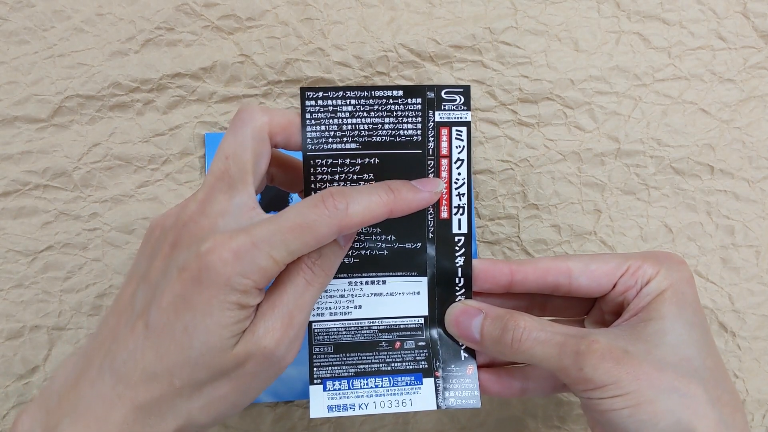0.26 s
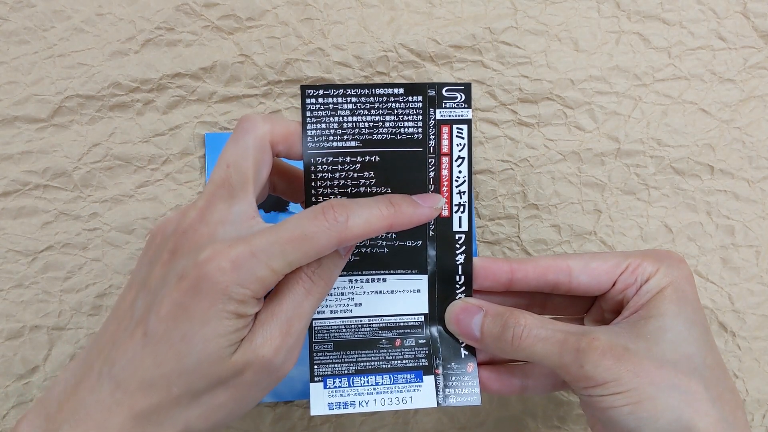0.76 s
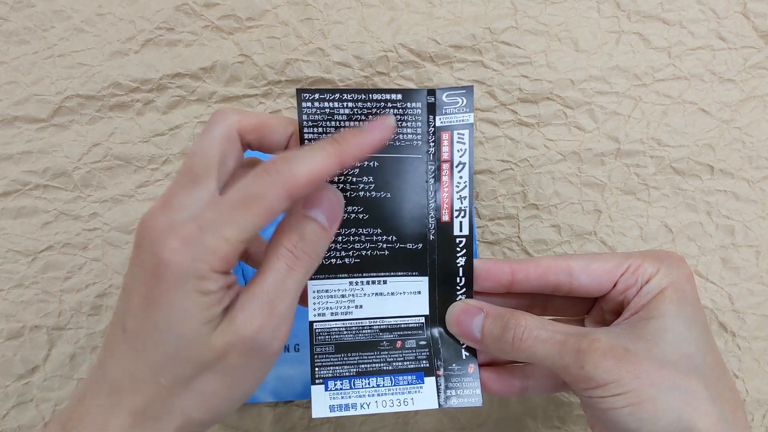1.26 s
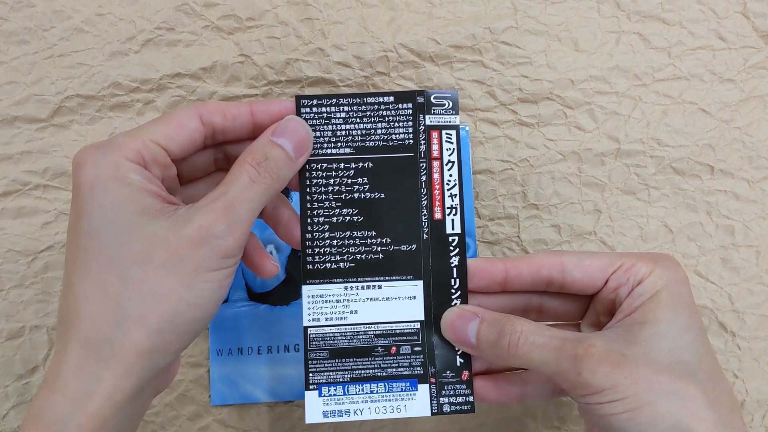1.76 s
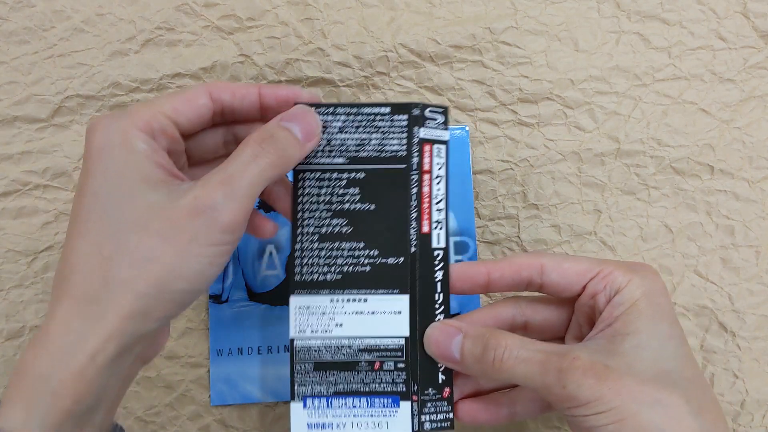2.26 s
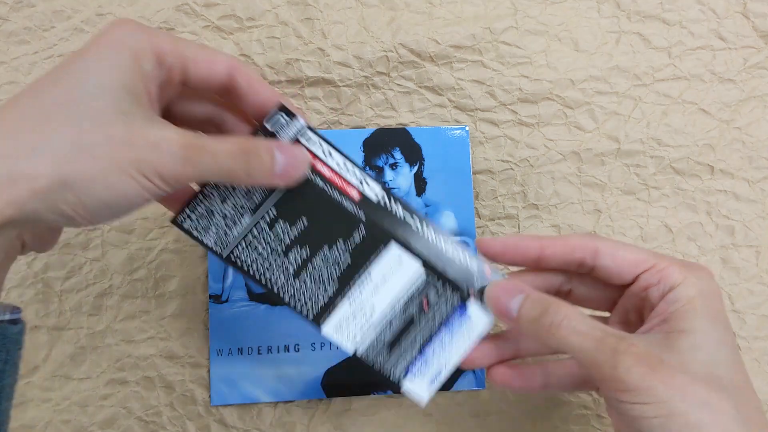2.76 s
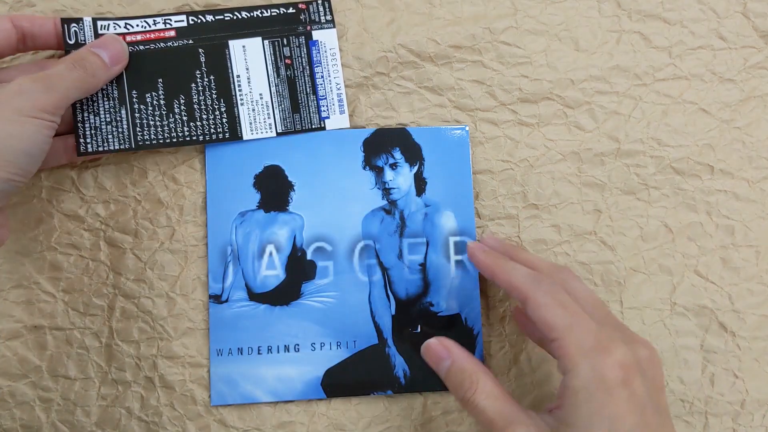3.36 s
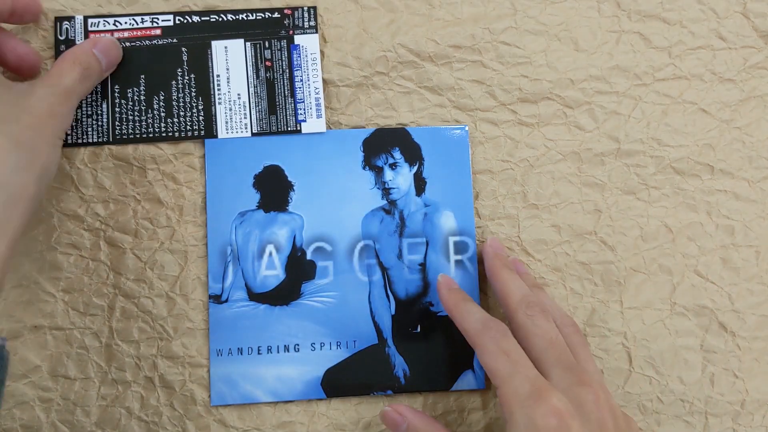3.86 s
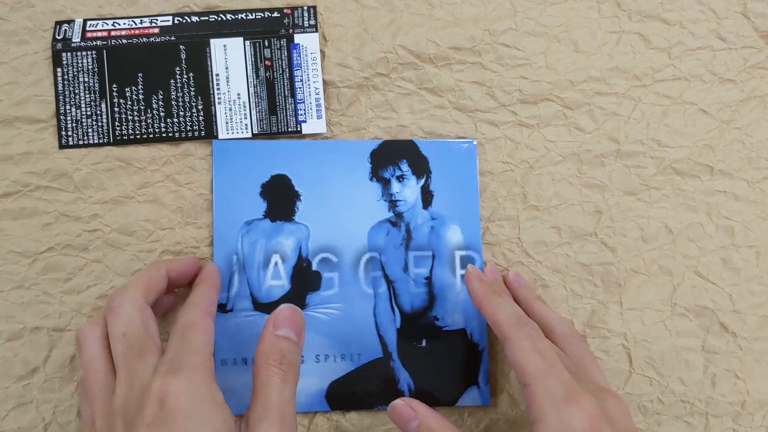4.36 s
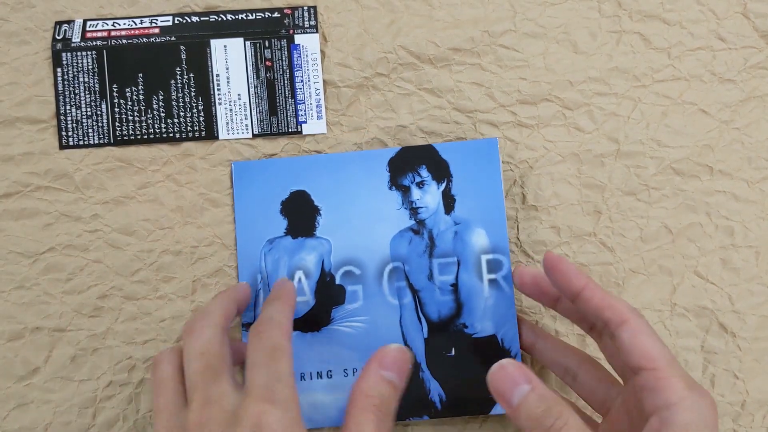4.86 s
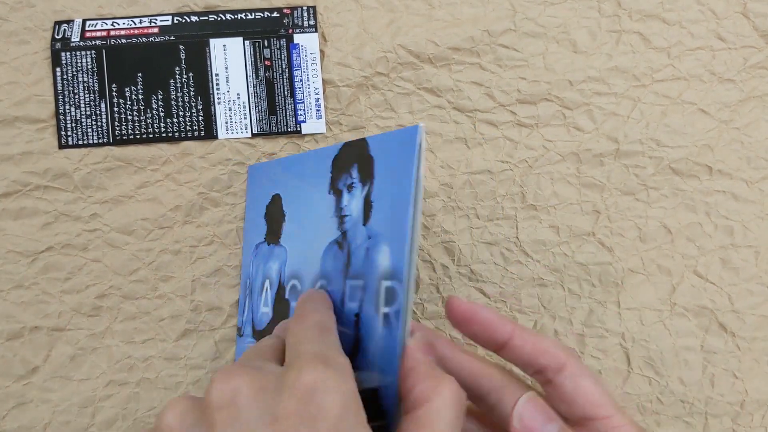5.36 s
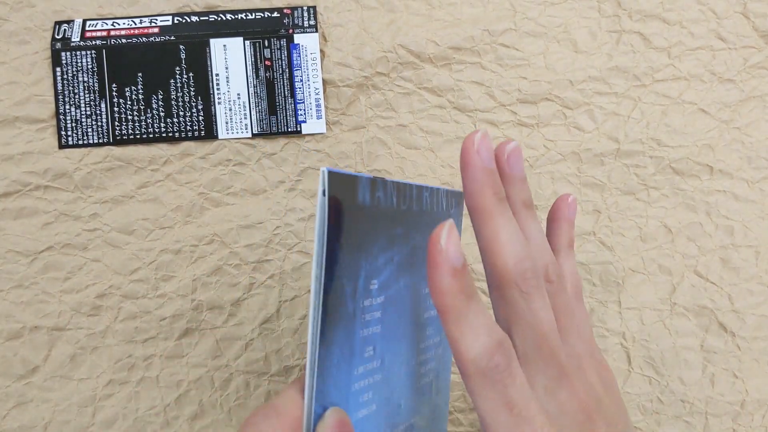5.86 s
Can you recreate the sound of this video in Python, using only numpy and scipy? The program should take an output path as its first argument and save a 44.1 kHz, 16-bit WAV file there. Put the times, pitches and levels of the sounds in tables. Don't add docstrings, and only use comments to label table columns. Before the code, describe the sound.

In a quiet room, hands handle a stiff paper strip close to a small microphone. After near silence and a faint rub, the strip buckles with a loud pop and snaps back more softly. Rustles and low card knocks follow, then sliding, a quick rising pull ending in a flick, and dull scrapes of a cardboard sleeve. Low hum and soft hiss continue underneath.

```python
import sys
import numpy as np
from scipy import signal
from scipy.io import wavfile
from scipy.ndimage import uniform_filter1d

SR = 44100
rng = np.random.default_rng(int(sys.argv[2]) if len(sys.argv) > 2 else 0)


def rack_gain(trim_db):
    fader = np.asarray(trim_db, float)
    return 10 ** (fader / 20)


def transcribe(signal):
    frames = np.atleast_2d(signal).T
    limited = np.clip(frames, -1, 1)
    pcm = np.round(limited * 32767).astype(np.int16)
    wavfile.write(sys.argv[1], SR, pcm)


N = 270333
LONGEST = 24000

# (frequency [Hz], density [dB per Hz])
AIR_SPECTRUM = [(12, -37.5), (20, -3.5), (48, -3.5), (72, -0.5), (107, -9.5), (156, -11), (366, -22.5),
                (881, -24.5), (1080, -25.5), (1490, -26.5), (3160, -27.5), (5220, -30), (7420, -36),
                (8000, -36), (10400, -78.5), (17600, -120)]
# (frequency [Hz], width [Hz], level [dB])
HUM_LINES = [(55.2, 5.2, -66.5), (142.2, 9.9, -63), (197, 15, -65.5)]
# (time [s], frequency [Hz], level [dB])
DUCT_THROB = [(0.0, 54.2, -53.5), (0.6, 60.5, -43), (1.01, 56.8, -54), (1.19, 61.7, -55),
              (1.96, 60.96, -51), (2.8, 57.64, -49.5), (3.33, 57.23, -52), (3.55, 61.64, -48),
              (3.86, 56.5, -64), (4.05, 60.6, -56), (4.299, 62.7, -61), (4.46, 56.9, -52.5),
              (5.04, 58.86, -52), (5.09, 61.96, -51), (5.62, 60.5, -43), (5.74, 63.96, -54.5),
              (5.84, 59.8, -49), (6.13, 59.8, -47.5)]
# (frequency [Hz], t60 [s])
ROOM_T60 = [(250, 0.34), (1000, 0.37), (3000, 0.14), (8000, 0.13)]
# (frequency [Hz], level [dB])
WALL_COLOUR = [(250, -1), (1100, -3), (2200, -3.5), (4000, 1.5), (8000, -0.5)]

# (frequency [Hz], width [Hz], level [dB])
STRIP_MODES = [(3740, 1000, -1.5), (5800, 940, 0.5), (7600, 1400, -5), (5200, 1800, -13)]
TAUT_MODES = [(3300, 1070, 6), (4280, 460, -10), (5200, 600, 0), (6400, 490, 1.5), (7600, 540, -7)]
CARD_MODES = [(1133, 160, 2), (1520, 420, -1.5), (1920, 130, -5.5), (872, 360, -0.5)]
FACE_MODES = [(979, 440, -17), (1300, 303, 3.5), (1560, 350, -3), (1900, 420, -2)]
SLEEVE_MODES = [(338, 360, -8.5), (480, 147, 2), (810, 400, -4), (243, 61, -2)]
# (frequency [Hz], level [dB], t60 [s])
KNOCK_RING = [(477, -5.5, 0.017), (755, -4.5, 0.022), (1150, 12, 0.02), (1463, 1.5, 0.023),
              (2100, 3.5, 0.014)]
POP_RING = [(376.6, -24, 0.038), (600, -20, 0.016), (772, -14.5, 0.018), (1150, -1, 0.01), (1310, -9, 0.01),
            (1832, -2.5, 0.0076), (2280, -8.5, 0.0092), (2877, -13, 0.0084), (3270, -13, 0.016),
            (4160, -22.5, 0.012), (5000, -37.5, .008), (5960, -31, .007)]
POP_BACK_RING = [(440, -8, 0.026), (834, -7, 0.027), (1032, 0, 0.023), (1353, 0, 0.02), (1940, -10, 0.017),
                 (2750, -10.5, 0.014), (3630, -3, 0.013), (4580, -13, 0.0088), (5140, -6, 0.0075),
                 (6000, -10.5, 0.011), (6400, -19, 0.0094), (7740, -15, .007)]
FLICK_RING = [(1050, -8.5, 0.019), (1570, -6.5, 0.019), (2100, -7, 0.0084), (2365, -2.5, 0.0099),
              (2625, 4.5, 0.011), (3210, 7, 0.0075), (3620, -1, 0.0096), (4070, -1, 0.013),
              (4720, -1, 0.0083), (6270, -11, 0.01), (7490, -16, 0.0095)]

# (start [s], hardest [s], end [s], level [dB], easing at both ends [dB])
SLEEVE_MOANS = [
    (3.89, 3.897, 3.908, -39, 10),
    (3.902, 3.916, 4.08, -55.5, 16),
    (4.185, 4.306, 4.43, -51, 8.2),
    (4.481, 4.516, 4.6, -47, 11),
]
TABLE_TOP_MOANS = [
    (5.0, 5.039, 5.35, -56.5, 7),
    (5.39, 5.508, 5.59, -56.5, 12),
]
STRIP_STROKES = [(2.2, 2.32, 2.5, -57.5, 15), (2.341, 2.345, 2.44, -53, 15), (2.35, 2.42, 2.54, -58, 7),
                 (2.1, 2.13, 2.5, -65.5, 5), (2.5, 2.544, 2.598, -57.5, 2), (2.598, 2.612, 2.596, -41, 2)]
TAUT_STROKES = [(1.213, 1.24, 1.28, -49, 3), (1.282, 1.288, 1.27, -51, 3), (2.05, 2.06, 2.08, -56.5, 3.8),
                (2.086, 2.092, 2.09, -50, 5)]
CARD_STROKES = [(.95, .97, 1.02, -62, 5.4), (1.213, 1.25, 1.28, -49.5, 3), (1.282, 1.288, 1.31, -58, 3.5),
                (1.97, 2.0, 2.06, -60, 11), (2.05, 2.06, 2.16, -58, 4.96), (2.078, 2.094, 2.108, -46.5, 9),
                (2.24, 2.29, 2.32, -55.5, 2.85), (2.32, 2.336, 2.36, -50, 4.2),
                (2.37, 2.42, 2.46, -54.5, 4), (2.5, 2.508, 2.525, -58, 6),
                (2.584, 2.603, 2.629, -52.5, 5.8), (3.887, 3.894, 3.97, -50.5, 20),
                (4.02, 4.036, 4.07, -64, 9.4), (4.25, 4.31, 4.4, -63, 4.7), (4.476, 4.51, 4.545, -51, 9.3),
                (4.8, 4.88, 4.94, -64, 6.2), (5.1, 5.11, 5.2, -64, 2.97), (5.22, 5.28, 5.3, -59.5, 11)]
FACE_STROKES = [(4.488, 4.512, 4.53, -46.5, 5.9), (4.545, 4.57, 4.595, -51.5, 3.7),
                (4.592, 4.605, 4.622, -48.5, 5.4)]
SLEEVE_STROKES = [(.95, .99, 1.02, -60, 6), (1.032, 1.042, 1.05, -49, 6), (1.214, 1.27, 1.293, -53, 3.8),
                  (2.2, 2.21, 2.26, -65, 8.7), (2.338, 2.344, 2.352, -50.5, 8.6),
                  (2.44, 2.46, 2.6, -58.5, 7.6), (3.886, 3.894, 3.96, -43, 25), (4.02, 4.036, 4.06, -57, 8),
                  (4.16, 4.3, 4.49, -59.5, 4.43), (4.482, 4.528, 4.55, -43.5, 6.5),
                  (4.54, 4.56, 4.62, -59, 7.9)]
# (start [s], hardest [s], end [s], level [dB], centre [Hz])
FINGER_SLIDES = [(0.293, 0.353, .362, -60, 4280), (0.945, 1.026, 1.028, -45.5, 4070),
                 (1.027, 1.039, 1.048, -44.5, 4300), (3.033, 3.09, 3.16, -49.5, 3600),
                 (3.13, 3.317, 3.47, -50, 3300), (3.883, 3.889, 3.93, -48, 5000),
                 (3.885, 3.932, 4.0, -52, 5200), (4.005, 4.144, 4.2, -54.5, 5800),
                 (4.139, 4.215, 4.31, -52, 5400), (4.238, 4.314, 4.41, -51.5, 5610),
                 (4.801, 4.849, 4.96, -57.5, 3720), (5.096, 5.116, 5.2, -56.5, 3686),
                 (5.224, 5.287, 5.3, -48, 3930), (4.417, 4.506, 4.56, -54, 3600),
                 (4.542, 4.578, 4.6, -56, 4000), (4.593, 4.61, 4.625, -52, 4800),
                 (4.648, 4.67, 4.69, -54, 4600)]
EDGE_DRAGS = [
    (3.057, 3.094, 3.125, -48, 2220),
    (3.952, 4.008, 4.08, -48, 6140),
]
# (time [s], level [dB], centre [Hz])
STRIP_PULL = [(3.43, -51, 4000), (3.47, -57.5, 3600), (3.552, -50.5, 3780), (3.6, -51, 4600),
              (3.638, -49, 5360), (3.649, -39.5, 5200), (3.657, -34.5, 4600), (3.66, -45, 4000)]
# (time [s], level [dB], frequency [Hz], upper re lower [dB])
PULL_RIDGES = [(3.43, -56, 2700, -4), (3.47, -58.5, 2900, -9), (3.53, -51, 2900, -9),
               (3.575, -53.5, 3050, -3), (3.605, -48.5, 3420, -3), (3.63, -44.5, 3220, -3),
               (3.648, -58, 3380, 0)]
# (start [s], hardest [s], end [s], level [dB], frequency [Hz])
SHEET_SQUEAKS = [(1.607, 1.616, 1.63, -41.5, 1350), (1.623, 1.63, 1.67, -56, 1200),
                 (1.621, 1.631, 1.644, -44.5, 2100), (2.076, 2.088, 2.098, -44, 3500),
                 (2.088, 2.09, 2.098, -48, 6300), (2.056, 2.059, 2.064, -62, 3400),
                 (2.343, 2.35, 2.5, -62, 3800), (2.41, 2.428, 2.45, -51.5, 3690),
                 (2.515, 2.54, 2.595, -59, 5770), (3.775, 3.779, 3.783, -55, 7400),
                 (3.782, 3.794, 3.806, -57, 3270), (4.484, 4.51, 4.525, -51, 1200),
                 (4.554, 4.575, 4.592, -50, 1400), (4.662, 4.668, 4.686, -52, 2680),
                 (4.655, 4.676, 4.687, -50, 1460)]
FACE_SCRAPES = [(2.165, 2.33, 2.47, -60, 2270), (2.491, 2.56, 2.6, -65, 2610),
                (4.504, 4.54, 4.555, -48.5, 2700), (4.545, 4.575, 4.597, -49, 2400),
                (4.591, 4.605, 4.62, -47, 2190), (4.614, 4.63, 4.66, -56.5, 2390),
                (4.648, 4.672, 4.688, -51.5, 2380)]
CREASE_RUBS = [(.953, .985, 1.0, -53, 4200), (.985, 1.008, 1.027, -50, 4900),
               (.99, 1.012, 1.027, -52, 2600), (1.0, 1.024, 1.027, -52, 6200),
               (1.03, 1.04, 1.047, -52, 4300), (1.856, 1.86, 1.866, -53, 3050),
               (2.062, 2.07, 2.08, -54, 4000), (3.03, 3.04, 3.06, -56, 4400),
               (3.08, 3.086, 3.095, -51, 4200), (3.879, 3.884, 3.893, -52, 7000),
               (3.918, 3.927, 3.94, -52, 6100), (3.92, 3.93, 3.935, -54, 7300),
               (3.93, 3.94, 3.95, -54, 3600), (4.526, 4.533, 4.546, -52, 4400),
               (4.598, 4.603, 4.612, -52, 5100), (2.6, 2.605, 2.625, -52, 1100)]

# (time [s], peak [dB], frequency [Hz], width [octaves])
FIBRE_BLIPS = [(1.214, -34, 3500, 2.5), (2.057, -48, 5800, .12), (2.0575, -44, 7600, .12),
               (2.064, -44, 7600, .12), (2.0946, -40.5, 1190, 0.46), (2.3425, -39.5, 3700, 0.14),
               (2.343, -40, 5630, .15), (2.5855, -42, 2980, 2.5), (2.9478, -39, 3000, 2.18),
               (2.9495, -40, 2007, .5), (3.091, -33, 2100, 0.3), (3.1, -26.5, 1980, 1.9),
               (3.105, -38, 2710, .6), (3.163, -37, 3000, 1.2), (3.062, -41, 5200, .2),
               (3.6225, -40, 3500, .6), (3.647, -36, 4500, 1.), (3.7583, -36, 1580, .4),
               (3.7594, -32.5, 2600, 0.26), (4.2987, -32, 3000, 1.9), (4.305, -39, 3500, 2.),
               (4.206, -43, 5900, .2), (4.225, -45, 4200, .15), (2.6, -36, 5940, 0.25),
               (2.4685, -33, 600, 0.9), (3.891, -39.5, 3125, .15), (3.886, -36, 5200, 0.16),
               (3.904, -43, 350, 0.94), (1.0364, -40, 706, 1.7), (1.0405, -45, 496, 0.9),
               (4.493, -35, 900, 1.2), (4.5135, -36, 1200, .8)]
CREASE_BLIPS = [(1.6042, -11.5, 1780, 0.99), (1.606, -23, 2600, 1.2), (1.8366, -22, 1090, 1.7),
                (1.8418, -25, 1190, 0.31), (1.847, -29.5, 1200, 0.48), (1.85, -37, 1195, .33)]
# (time [s], peak [dB], centre [Hz], card ring re crack [dB], width [octaves])
EDGE_TICKS = [(1.285, -39, 3170, -24, 0.52), (2.055, -45, 5640, 3, 2.2), (3.112, -47, 2300, -21, 0.58),
              (3.435, -48, 2730, -19, .44), (3.513, -37.5, 3530, -25, 1.1), (3.764, -39.5, 2555, -6, 0.79),
              (3.774, -40.5, 3500, -11.5, 2.3), (3.884, -38, 5300, -17.5, 0.39),
              (4.301, -40, 4280, -5, 2.1), (4.321, -40.5, 4000, -1, 2.1), (5.034, -38.5, 3440, -5.5, 1.7),
              (4.594, -43, 2600, -10, 1.5)]
FIBRE_SNICKS = [(2.599, -30, 4500, -9, 1.8), (2.948, -41, 3500, -17, 1.4), (1.214, -40, 3420, -6.5, 1.2),
                (3.1, -44, 2460, -10, 1), (3.163, -42, 2800, -17, 0.83), (3.655, -24, 4140, -25, 1.3),
                (4.204, -41, 5777, -20, .6), (4.2981, -33.5, 3190, -3, 1.8),
                (5.048, -36.5, 5870, -21, 0.55), (5.295, -36, 5000, -17, 2.6),
                (0.317, -45.5, 4600, -17, .6), (.349, -46, 4800, -22, 1), (2.258, -45, 4500, -7, 2.1),
                (2.331, -37.5, 3800, -7, 1), (2.585, -37, 3800, -11, 2.9), (3.567, -45, 3350, -20, 1.1),
                (3.601, -46, 3550, -23, 0.91)]
# (time [s], peak [dB], main ring [Hz], crack re ring [dB])
CARD_KNOCKS = [(1.033, -41.5, 850, -21), (2.094, -36.5, 1150, -19), (2.296, -41, 1300, -20),
               (2.341, -30, 1290, -10), (2.4671, -29, 983, -11), (2.471, -24.5, 865, -19),
               (2.476, -30.5, 1236, -19), (2.482, -34.5, 1210, -23), (2.503, -41.5, 401, -22),
               (3.016, -36, 296, -13), (3.8906, -25.5, 350, -21), (4.039, -45, 576, -18),
               (2.342, -34, 500, -16), (4.4972, -35, 480, -19), (4.5035, -32, 454, -14),
               (4.521, -31, 437, -17), (4.529, -34, 399, -14), (4.5326, -33, 410, -11)]
# (time [s], peak [dB], rise [s], crack re ring [dB])
FLICK_RELEASES = [
    (3.7535, -25, 0.0007, -25),
    (3.7549, -28, 0.00024, -18),
    (3.7563, -18.5, 0.00079, -19),
    (3.7588, -27.5, 0.00038, -21),
]
POP_RELEASES = [
    (1.6043, -13, .001, -40),
    (1.60605, -14, .0006, -30),
]
POP_BACK_RELEASES = [
    (1.8368, -18, 0.00058, -10),
    (1.8392, -27, 0.00022, -4),
    (1.845, -40, 0.001, -17),
    (1.8555, -38, 0.001, -25),
]
# (time [s], level [dB], centre [Hz], width [octaves], t60 [s])
STRIP_SHIVERS = [
    (1.61, -39, 1770, 1.4, 0.24),
    (1.844, -41.5, 1300, 1.6, 0.14),
]


def evened(x):
    return x / np.sqrt(np.mean(x ** 2) + 1e-20)


def read(points, hz):
    f, value = np.transpose(points)
    return np.interp(np.log(hz + 1), np.log(f + 1), value)


def add(mix, s, sound):
    part = mix[round(s * SR):][:len(sound)]
    part += sound[:len(part)]


def mixed(sounds):
    out = np.zeros(N)
    for s, sound in sounds:
        add(out, s, sound)
    return out


def wander(size, span):
    noise = rng.standard_normal(max(size, LONGEST))
    return evened(uniform_filter1d(uniform_filter1d(noise, span), span))[:size]


def resonate(x, hz, width, order=2):
    turn = np.exp(2j * np.pi * np.cumsum(hz * np.ones(len(x))) / SR)
    r = np.exp(-np.pi * width / SR)
    low = x / turn
    for _ in range(order):
        low = signal.lfilter([1 - r], [1, -r], low)
    return 2 * (turn * low).real


def band(x, hz, octaves):
    return evened(resonate(x, hz, np.mean(hz) * np.clip(octaves, .1, 3), order=3))


def air():
    frames, hz = N // 1024 + 5, np.fft.rfftfreq(4096, 1 / SR)
    a, b, patches = rng.standard_normal((frames, 2049, 3)).T
    patches = evened(uniform_filter1d(uniform_filter1d(patches, 40, 0), 5, 1))
    z = (a + 1j * b) * rack_gain(read(AIR_SPECTRUM, hz)[:, None] + .7 * patches)
    out = rack_gain(-48.5) * evened(signal.istft(z, nperseg=4096, noverlap=3072)[1][:N])
    for hz, width, db in HUM_LINES:
        out += rack_gain(db) * evened(resonate(rng.standard_normal(N), hz, width))
    return out


def throb():
    s, hz, db = np.transpose(DUCT_THROB)
    t = np.arange(N) / SR
    turns = np.cumsum(np.interp(t, s, hz) + 1.42 * wander(N, 3000)) / SR
    level_db = np.interp(t, s, db) - 1.5 + 2.5 * wander(N, 2500)
    return np.sqrt(2) * rack_gain(level_db) * np.sin(2 * np.pi * turns)


def room(x):
    taps = np.zeros(SR // 2)
    at = np.arange(200, SR // 2 - 20, 20)
    taps[at + rng.integers(0, 20, len(at))] = rng.choice([-1., 1.], len(at))
    hz, t, z = signal.stft(taps, SR, nperseg=256)
    decay_db = read(WALL_COLOUR, hz)[:, None] - 60 * t / read(ROOM_T60, hz)[:, None]
    tail = signal.istft(z * rack_gain(decay_db), SR, nperseg=256)[1]
    return signal.fftconvolve(x, tail / np.linalg.norm(tail))[:N]


def press(start, hardest, end, db, ease_db):
    t = np.arange(start, end, 1 / SR)
    away = np.interp(t, [start, hardest, end], [1, 0, 1])
    contact = np.clip(np.minimum(t - start, end - t) / 0.0016, 0, 1)
    return rack_gain(db - ease_db * away ** 1.54) * contact


def moan(row, hz):
    gain = press(*row)
    return row[0], gain * evened(resonate(rng.standard_normal(LONGEST)[:len(gain)], hz, 59))


def friction(size, grain_db=2.5, slips_per_s=12000, clump_db=0.8):
    pick, sign, heft = rng.random(LONGEST), rng.standard_normal(LONGEST), rng.exponential(1, LONGEST)
    clicks = sign * (pick < slips_per_s / SR) * rack_gain(grain_db * np.minimum(heft, 4))
    return clicks[:size] * rack_gain(clump_db * wander(size, 250))


def body(x, modes, flutter_db=1.5):
    out = np.zeros(len(x))
    for k, (hz, width, db) in enumerate(modes):
        gain = rack_gain(db + flutter_db * wander(len(x), 300))
        out += (-1) ** k * gain * resonate(x, hz, width)
    return evened(out)


def rub(row, modes):
    gain = press(*row)
    return row[0], gain * body(friction(len(gain)), modes)


def hiss(size, hz, octaves):
    share = np.clip((octaves - .3) / 1.28, 0, 1)
    narrow = band(friction(size), hz, np.mean(octaves))
    wide = band(friction(size), 4300, 2.04)
    return np.sqrt(1 - share) * narrow + np.sqrt(share) * wide


def slide(start, hardest, end, db, hz, octaves, ease_db):
    gain = press(start, hardest, end, db, ease_db)
    below_peak_db = 20 * np.log10(gain + 1e-9) - db
    return start, gain * hiss(len(gain), hz, octaves + 0.05 * below_peak_db)


def pull():
    s, db, hz = np.transpose(STRIP_PULL)
    t = np.arange(s[0], s[-1], 1 / SR)
    sound = hiss(len(t), np.interp(t, s, hz), 0.78)
    return s[0], rack_gain(np.interp(t, s, db)) * sound * signal.windows.tukey(len(t), .03)


def squeak(start, hardest, end, db, hz, octaves, ease_db):
    gain = press(start, hardest, end, db, ease_db)
    return start, gain * band(friction(len(gain), clump_db=2.5), hz, octaves)


def ridges():
    s, db, hz, upper_db = np.transpose(PULL_RIDGES)
    t = np.arange(s[0], s[-1], 1 / SR)
    hz = np.interp(t, s, hz)
    grit = friction(len(t), grain_db=0.5, slips_per_s=4600, clump_db=1.5)
    lower = band(grit, hz, 0.3)
    upper = rack_gain(np.interp(t, s, upper_db)) * band(grit, 1.27 * hz, 0.3)
    return s[0], rack_gain(np.interp(t, s, db)) * (lower + upper) * signal.windows.tukey(len(t), .05)


def blip(s, db, hz, octaves):
    out = band(-signal.unit_impulse(1500), hz, octaves)
    return s, rack_gain(db) * out / abs(out).max()


def crackle(hz, octaves, length_s, tail_s=0.0025):
    t = np.arange(1500) / SR
    shape = np.clip(t / 0.00024, 0, 1) * np.exp(-np.maximum(t - length_s, 0) / tail_s)
    out = band(rng.standard_normal(len(t)) * shape, hz, octaves)
    return out / abs(out).max()


def tick(s, db, hz, ring_db, octaves, length_s):
    bright = crackle(hz, octaves, length_s)
    return s, rack_gain(db) * (bright + rack_gain(ring_db) * crackle(1210, 0.89, length_s))


def shiver(s, db, hz, octaves, t60):
    t = np.arange(SR // 4) / SR
    gain = rack_gain(db - 60 * t / t60) * np.clip(t / 0.0027, 0, 1)
    return s, gain * band(friction(len(t), clump_db=1.5), hz, octaves)


def ring(modes, stretch, rise_s):
    t = np.arange(3000) / SR
    out = sum(rack_gain(db - 60 * t / t60) * np.sin(2 * np.pi * hz * stretch * t) for hz, db, t60 in modes)
    out = -out * np.clip(t / max(rise_s, 1 / SR), 0, 1)
    return out / abs(out).max()


def pop(modes, stretch, s, db, rise_s, crack_db):
    sound = ring(modes, stretch, rise_s)
    add(sound, 0, rack_gain(crack_db) * crackle(3000, 3.6, 0.0025))
    return s, rack_gain(db) * sound


def scene():
    background = air() + throb()
    sounds = [moan(row, 336) for row in SLEEVE_MOANS] + [moan(row, 200) for row in TABLE_TOP_MOANS]
    for rows, modes in [(STRIP_STROKES, STRIP_MODES), (TAUT_STROKES, TAUT_MODES), (CARD_STROKES, CARD_MODES),
                        (FACE_STROKES, FACE_MODES), (SLEEVE_STROKES, SLEEVE_MODES)]:
        sounds += [rub(row, modes) for row in rows]
    sounds += [slide(*row, octaves=1.35, ease_db=11.5) for row in FINGER_SLIDES]
    sounds += [slide(*row, octaves=0.87, ease_db=11.5) for row in EDGE_DRAGS]
    sounds += [pull(), ridges()]
    sounds += [squeak(*row, octaves=0.19, ease_db=4) for row in SHEET_SQUEAKS]
    sounds += [squeak(*row, octaves=1.47, ease_db=5.5) for row in FACE_SCRAPES]
    sounds += [squeak(*row, octaves=.25, ease_db=10) for row in CREASE_RUBS]
    sounds += [blip(*row) for row in FIBRE_BLIPS]
    sounds += [tick(*row, length_s=0.0057) for row in EDGE_TICKS]
    sounds += [tick(*row, length_s=0.00086) for row in FIBRE_SNICKS]
    for s, db, hz, crack_db in CARD_KNOCKS:
        sounds.append(pop(KNOCK_RING, hz / 1150, s, db, 0.00083, crack_db))
    sounds += [pop(FLICK_RING, 1, *row) for row in FLICK_RELEASES]
    hands = mixed(sounds)
    shivers = mixed([shiver(*row) for row in STRIP_SHIVERS])
    releases = [pop(POP_RING, 0.94, *row) for row in POP_RELEASES]
    releases += [pop(POP_BACK_RING, 0.97, *row) for row in POP_BACK_RELEASES]
    pops = mixed(releases + [blip(*row) for row in CREASE_BLIPS])
    aimed = rack_gain(-7) * pops
    walls = rack_gain(-14.5) * room(hands + aimed)
    return (hands + pops + walls + shivers + background)[None]


def top_cut(x):
    return signal.sosfilt(signal.butter(12, 8790, fs=SR, output="sos"), x)


def record(dry):
    power_db = 10 * np.log10(abs(uniform_filter1d(dry[0] ** 2, 400, origin=199)) + 1e-12)
    fall = np.arange(N) * 9.9 / SR
    over_db = np.maximum(np.maximum.accumulate(power_db + fall) - fall + 26.5, 0)
    duck_db = 0.43 * uniform_filter1d(over_db, 600, origin=299)
    ducked = dry / rack_gain(duck_db) - .0004
    edge = signal.butter(12, 7730, fs=SR, output="sos")
    return top_cut(signal.sosfilt(edge, signal.sosfilt(edge, ducked)))


dry = scene()
out = record(dry)
transcribe(out)
```